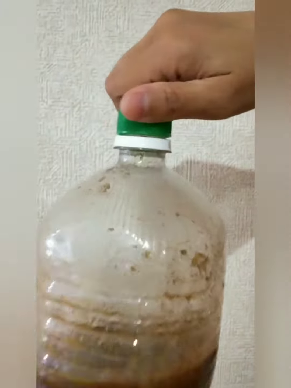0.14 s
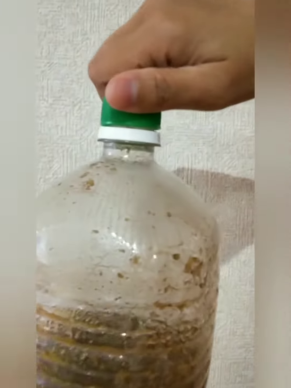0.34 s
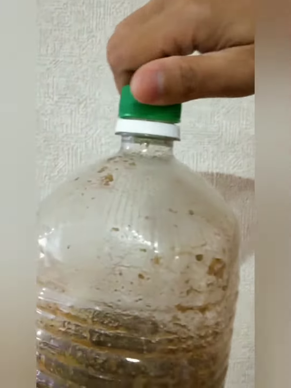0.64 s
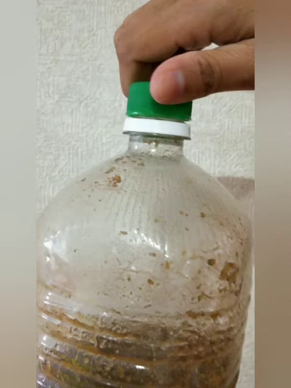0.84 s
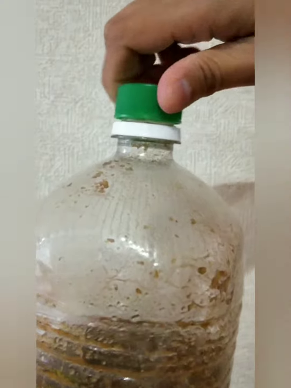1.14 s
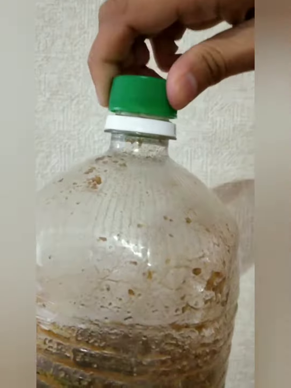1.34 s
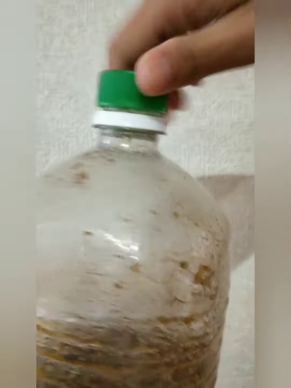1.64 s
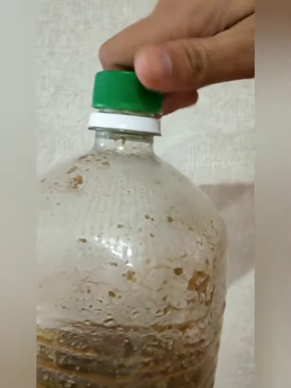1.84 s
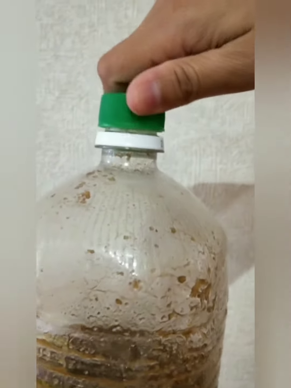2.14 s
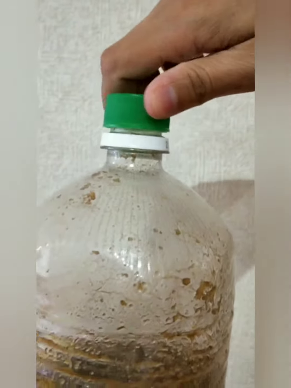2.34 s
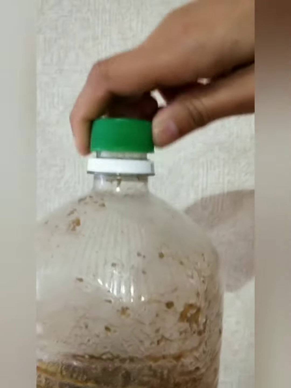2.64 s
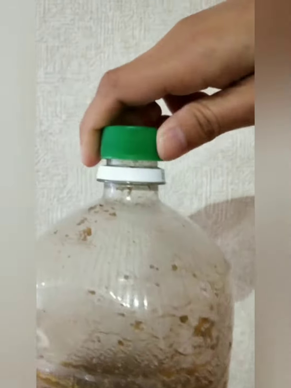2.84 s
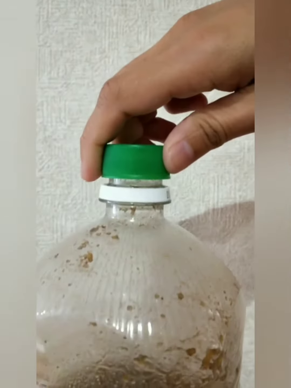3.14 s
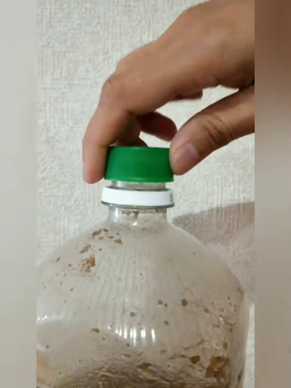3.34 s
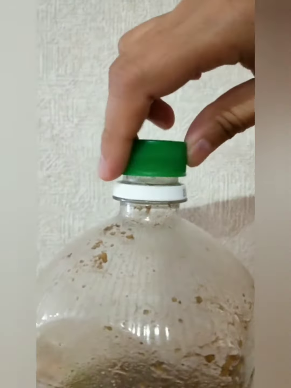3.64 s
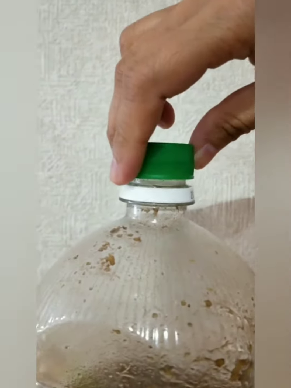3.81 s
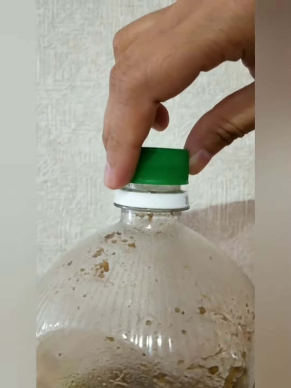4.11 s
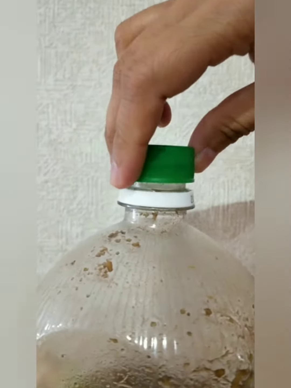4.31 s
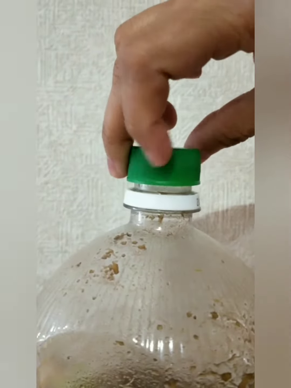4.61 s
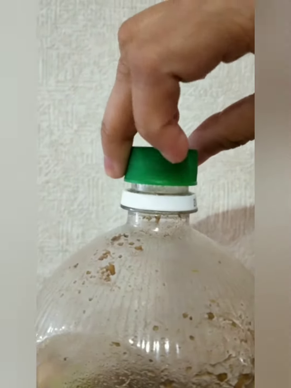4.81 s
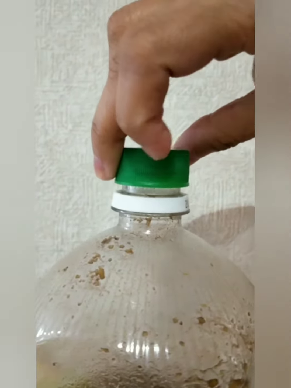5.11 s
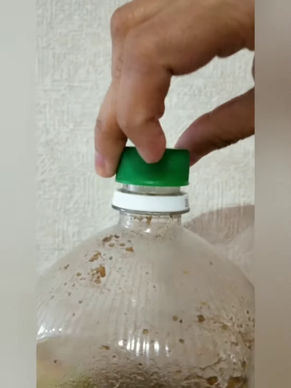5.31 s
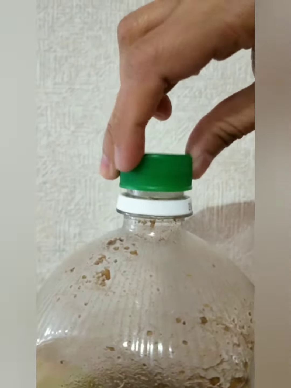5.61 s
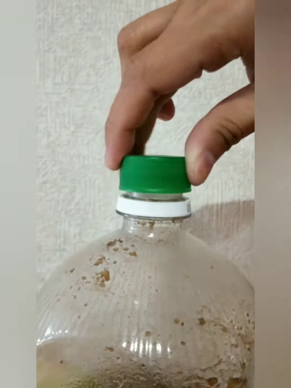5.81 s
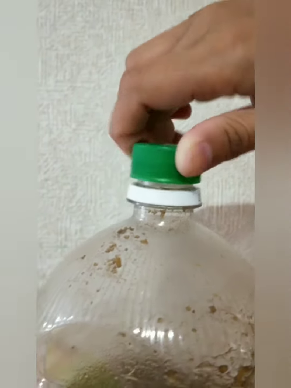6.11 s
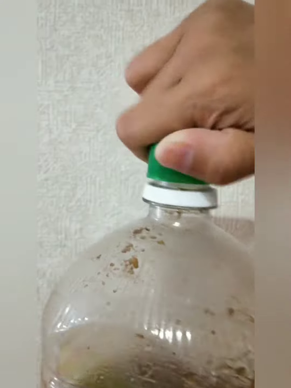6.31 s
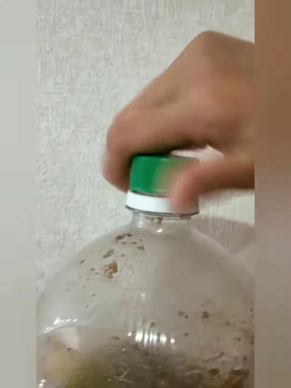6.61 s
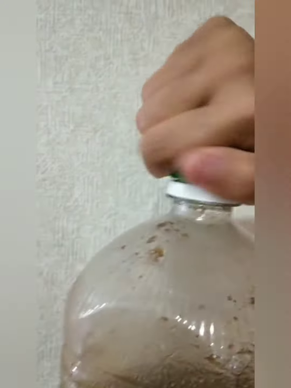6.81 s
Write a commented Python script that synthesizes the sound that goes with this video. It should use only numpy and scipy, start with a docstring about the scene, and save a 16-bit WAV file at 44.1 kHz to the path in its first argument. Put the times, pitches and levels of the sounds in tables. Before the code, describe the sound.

A phone microphone close to a large plastic bottle picks up low room rumble and tiny handling clicks. The cap loosens and pressurised gas rushes out in a strong sibilant hiss, leaning to the right. Over it, irregular loud cracks of buckling plastic ring briefly, nearer the left. The hiss sags and closes off, leaving near silence, faint creaks, and finally scratchy rubbing and light knocks.

```python
"""Over a low room hum, fingers slip, rub and knock on the cap of a large plastic bottle of fermenting drink.
The cap is eased close to a phone in a small room: gas hisses out as turbulent noise in two coloured bands.
As the pressure falls, the swollen wall snaps back panel by panel, each push ringing the wall's modes.
Creaks, rubs and knocks before and after are contacts that shake the same modes far more gently."""
import sys
import numpy as np
from scipy import signal
from scipy.fft import rfft, irfft, next_fast_len
from scipy.io import wavfile
from scipy.ndimage import uniform_filter1d, map_coordinates

SR = 44100
rng = np.random.default_rng(int(sys.argv[2]) if len(sys.argv) > 2 else 0)


def wrap_up_sound(samples):
    """Save the sound to the file named by the first command line argument, as 16-bit audio."""
    columns = np.atleast_2d(samples).T
    # keep every value between -1 and 1, then stretch to whole-number steps
    tamed = np.clip(columns, -1, 1)
    steps = np.round(tamed * 32767).astype(np.int16)
    wavfile.write(sys.argv[1], SR, steps)


N = 306495

# Spectrum of dry friction, for creaks and rubs: frequency_hz, relative density_db (per Hz)
SCRATCH_SPECTRUM = [(2200, -24), (3200, -9), (4200, -18.5), (5500, 0), (6500, 1.5), (7300, -15),
                    (9000, -32.5), (16000, -36)]


def gas(puff_rise_s=0.051, puff_fall_s=.1, puff_jet_db=-5):
    """Turbulent jet noise: the level follows the flow, and the finest hiss, on the right, fades fastest."""
    # Broad hiss of the jet under the cap: frequency_hz, relative density_db (per Hz)
    jet_spectrum = [(50, -17), (130, -12.5), (450, -19), (900, -20.5), (1600, -12), (2800, -10),
                    (3700, -24), (4400, -16), (5200, -7), (6300, 2.5), (7200, -10.5), (8700, -11.5),
                    (16000, -26.5)]
    # Finest hiss: frequency_hz, relative density_db (per Hz)
    spray_spectrum = [(3000, -38), (7000, -12.5), (8800, -18), (10000, -16.5), (12500, -14), (13700, -10.5),
                      (15000, -2), (16000, -13.5)]
    # Small leaks as the cap shifts: start_s, length_s, level_db
    puff_table = [(1.503, 0.022, -90), (6.597, 0.042, -86), (6.665, 0.017, -79.5), (6.742, 0.018, -76.5)]
    # The seal opens, the pressure holds and then sags, and the seal closes again
    open_s, open_for_s, open_rise_s, close_fall_s = 2.5903, .7, 0.069, 0.49
    hold_s, sag_s, sag_db = 0.18, 0.41, 9.5
    jet_db, spray_db = -39, -33  # at full flow, before flutter and room
    spray_growth = 1.55  # dB of fine spray per dB of flow

    spent = np.clip((np.arange(N) / SR - open_s - hold_s) / sag_s, 0, 1)
    pressure_db = -sag_db * np.sin(np.pi / 2 * spent) ** 2
    flow_db = stroke_db(open_s, open_for_s, open_rise_s, close_fall_s) + pressure_db
    puffs = sum(amp(db + stroke_db(s, length_s, puff_rise_s, puff_fall_s)) for s, length_s, db in puff_table)
    flutter = amp(0.087 * wobble(45) + 0.92 * wobble(250))

    jet_level = amp(jet_db + flow_db) + amp(puff_jet_db) * puffs
    jet = jet_level * noise(shape(jet_spectrum), alike=.6) * pan(-.5)
    spray_level = amp(spray_db + spray_growth * flow_db) + puffs
    spray = spray_level * noise(shape(spray_spectrum), alike=.6) * pan(-8.5)
    return in_room(flutter * (jet + spray), wet_db=-8.5)


def snaps(crisp_hz=2690):
    """Snap-through buckling, panel by panel: a sharper flip ticks more, thuds less and lies further left."""
    # Panel flips: start_s, relative level_db, sharpness_hz, panel_pitch_hz, relative ring_db
    flips = [(3.1376, -20, 2860, 1137, 1.5), (3.2340, -16.5, 1491, 795, 4.5), (3.3713, -23, 1876, 1520, 3),
             (3.4017, -22.5, 2460, 2110, 3), (3.4690, -30.5, 3546, 1520, -1), (3.5447, -23.5, 1670, 557, 6),
             (3.6779, -50, 1450, 1000, -5)]
    out = np.zeros((2, N))
    for s, db, sharp_hz, panel_hz, ring_db in flips:
        octaves = np.log2(sharp_hz / crisp_hz)  # sharpness against a typical crisp snap
        tick_db = 0.91 + 31 * octaves
        thud_db = -14.5 - 17.5 * octaves
        side_db = 5.8 + 3 * octaves
        add(out, s, snap(db, sharp_hz, panel_hz, ring_db, tick_db, thud_db, side_db))
    return out


def snap(db, sharp_hz, panel_hz, ring_db, tick_db, thud_db, side_db, panel_q=13, tick_hz=5850, tick_width=1250,
         landing_s=0.0063, landing_hz=850, bounce_db=-5, bounce_t60=0.064, bass_ratio=11):
    """Impulse response of a flip: a sharp push rings panel and wall, the crease ticks, a duller push lands."""
    t = np.arange(SR * 2 // 3) / SR
    push = np.zeros((2, len(t)))
    push[:, 0] = 1
    # The push bounces about the bottle and off the near wall, dying within tens of milliseconds
    bounce_fade = amp(-60 * t / bounce_t60) * (1 - np.exp(-t / .0012))
    bounces = noise(np.ones_like, alike=0.6, size=len(t)) * bounce_fade
    bounces *= amp(bounce_db) / np.linalg.norm(bounces[0])

    def shell(f):
        """Transfer function from the push to the sound of wall, crack, landing and tick."""
        delay = np.exp(-2j * np.pi * f * landing_s)
        landing = amp(thud_db) * softened(f, landing_hz) * delay
        # The moving panel shoves the air directly, beside the modes
        crack = amp(-3) * resonance(f, 1600, 4300) * resonance(f, 1607, 5600)
        tick_band = resonance(f, tick_hz, tick_width) * resonance(f, 5500, 6900)
        tick = amp(tick_db - 8.5) * tick_band * softened(f, 7000) ** 3
        # A quicker flip is a smaller panel, which moves less bass
        thin = (1j * f / (1j * f + sharp_hz / bass_ratio)) ** 2
        return softened(f, sharp_hz) * thin * (wall(f) + crack) + landing * wall(f) + tick

    def panel_mode(f):
        """The flipping panel's own resonance under the same push."""
        return softened(f, sharp_hz) * resonance(f, panel_hz, panel_hz / panel_q)

    panel = amp(ring_db - 0.5) * filtered(push, panel_mode)
    struck = filtered(push + bounces, shell) + panel
    return in_room(amp(db + 33.5) * struck, wet_db=-12.5) * pan(side_db)


def wall(f, vary_db=3.5, detune=0.014):
    """Modal superposition: the bottle wall's modes, excited a little differently by each contact."""
    # Modes of the bottle wall: mode_hz, width_hz, level_db (before random variation)
    modes = [(162, 69, -12.5), (315, 43, -7.5), (410, 43, -10.5), (573.4, 120, -3.5), (682.4, 40, -5),
             (792.6, 70, -3.5), (938, 34, -7.5), (1109.5, 100, -0.5), (1320, 110, -5.5), (1455, 160, 2.5),
             (1619, 110, -11.5), (1979, 57, 3.5), (2580, 430, -12.5), (3230, 380, -4), (3400, 150, -7)]
    chance = rng.standard_normal((len(modes), 2))
    total = 0
    for k, ((hz, width, db), (louder, sharper)) in enumerate(zip(modes, chance)):
        mode = resonance(f, hz * (1 + detune * sharper), width)
        total = total + (-1) ** k * amp(db + vary_db * louder) * mode  # neighbours in opposite phase
    return total


def knocks(ring_db=7.5, thud_db=-6, side_db=5):
    """Impact excitation: a light knock on the cap rings the same wall as a snap, far more gently."""
    # Knocks of fingers and thread: start_s, relative level_db, sharpness_hz, pitch_hz, relative tick_db
    taps = [(0.703, -57, 780, 386, -28), (1.499, -63, 604, 282, -31.5), (4.807, -57, 1390, 1410, -3.5),
            (4.8412, -58, 1405, 1530, -9.5), (6.412, -59, 1530, 806, -5.5), (6.858, -50, 2230, 886, -12),
            (6.8859, -49, 2160, 1030, -10), (6.932, -45, 1580, 1086, 5)]
    out = np.zeros((2, N))
    for s, db, sharp_hz, hz, tick_db in taps:
        knock = snap(db, sharp_hz, hz, ring_db, tick_db, thud_db, side_db, tick_hz=6200, tick_width=390)
        add(out, s, knock)
    return out


def rubs(rub_q=1.68, rise_s=0.13, fall_s=0.1, squeak_db=-3):
    """Sliding friction: uneven little catches shake the wall, squeak faintly and scratch."""
    # Rubs of fingers and thread: start_s, length_s, relative level_db, pitch_hz, scratch_db (over the wall)
    strokes = [(1.11, 0.081, -88, 1366, -18), (1.443, .05, -88.5, 1290, -7), (1.74, 0.063, -80.5, 920, -19),
               (3.769, 0.21, -86.5, 750, -14), (4.53, 0.26, -77, 700, -28.5), (6.279, .04, -84, 1100, -8.5),
               (6.499, .18, -72.5, 885, -2.5), (6.749, 0.017, -71, 894, 4), (6.839, .11, -69, 1090, -1.5)]
    out = np.zeros((2, N))
    for s, length_s, db, hz, scratch_db in strokes:
        start = round((s - .2) * SR)  # early enough for the rise
        level = amp(db + stroke_db(s, length_s, rise_s, fall_s)[start:start + SR])
        size = len(level)
        body = noise(lambda f: wall(f) * resonance(f, hz, hz / rub_q) ** 2, alike=0.57, size=size)
        body = (body + amp(squeak_db) * squeak(hz, size=size)) * pan(6.3)
        scratch = noise(shape(SCRATCH_SPECTRUM), alike=0.11, size=size)
        add(out, start / SR, level * (body + amp(scratch_db) * scratch))
    catches = unit(amp(4.0 * wobble(60) + 1.7 * wobble(300)))
    return in_room(catches * out, wet_db=-8)


def creaks(slip_hz=330, slip_db=3, width_ratio=1.2, squeak_db=4):
    """Stick-slip friction: a brief run of uneven slips shakes the wall, squeaks at one pitch and scratches."""
    # Creaks of cap and wall: middle_s, relative level_db, half_length_s, pitch_hz, scratch_db (over the wall)
    slips = [(0.559, -79, 0.0058, 1303, -24), (.961, -81.5, 0.0085, 1280, -26),
             (1.142, -80.5, 0.013, 2520, 2), (1.508, -61, .009, 1310, -10), (1.517, -62, .009, 433, -13),
             (2.973, -40, .005, 1430, -24.5), (3.09, -42.5, 0.0038, 2090, -23),
             (4.532, -79.5, 0.0023, 757, -11), (4.563, -74.5, .005, 723, -18),
             (4.708, -70.5, 0.0028, 708, -28), (5.324, -85, .006, 2570, -0.5),
             (5.688, -71, 0.0046, 1155, -20.5), (5.802, -57.5, 0.0047, 896, -24),
             (5.805, -69, 0.006, 1988, -21)]
    out, t = np.zeros((2, N)), np.arange(SR // 2) / SR
    middle, size = t[-1] / 2, len(t)
    for s, db, half_s, hz, scratch_db in slips:
        body = noise(lambda f: wall(f) * resonance(f, hz, hz * width_ratio), alike=.8, size=size)
        scratch = noise(shape(SCRATCH_SPECTRUM), alike=0.18, size=size)
        swell = amp(db) * np.exp(-((t - middle) / half_s) ** 2 / 2)
        creak = body + amp(squeak_db) * squeak(hz, size=size) + amp(scratch_db) * scratch
        add(out, s - middle, swell * creak)
    unevenness = unit(amp(slip_db * wobble(slip_hz)))
    return in_room(out * unevenness * pan(2.1), wet_db=-8.0)


def squeak(hz, size=N, q=14):
    """Stick-slip near one rough pitch, as noise through a narrow and a broad resonance."""
    return noise(lambda f: resonance(f, hz, hz / q) * resonance(f, hz, hz / 3), alike=0.33, size=size)


def ambience():
    """Steady background: uneven low rumble of the building, wavering mains hum and faint microphone hiss."""
    # Rumble of the building: frequency_hz, relative density_db (per Hz)
    rumble_spectrum = [(30, -30), (42, -12.5), (60, -10.5), (75, -9.5), (100, 0), (125, -9.5), (155, -5.5),
                       (200, -10.5), (310, -16.5), (400, -30), (640, -37), (1300, -45.5), (4000, -57.5),
                       (16000, -60.5)]
    # Mains hum: frequency_hz, peak_db (about which it wavers)
    hum_tones = [(51.5, -74), (101, -71)]
    t = np.arange(N) / SR
    hum = 0
    for hz, db in hum_tones:
        phase = 2 * np.pi * hz * t + 0.62 * wobble(1)
        hum = hum + amp(db + wobble(27)) * np.sin(phase)
    rumble = patchy(noise(shape(rumble_spectrum), alike=.92), depth_db=3.5, size=2048)
    hiss = noise(np.ones_like, alike=0)
    return hum + amp(-69.0) * rumble + amp(-102) * hiss


def in_room(x, wet_db, build_s=0.0064):
    """Reverberation: x plus a diffuse tail that builds up quickly and decays at its own rate in each band."""
    # Decay of the room: frequency_hz, t60_s
    decay_times = [(150, .5), (500, 0.5), (1500, 0.3), (6000, 0.26), (15000, 0.29)]
    hz, t, z = signal.stft(rng.standard_normal((2, SR * 3 // 4)), SR, nperseg=256)
    fade = amp(-60 * t / along(decay_times, hz)[:, None]) * (1 - np.exp(-t / build_s))
    tail = signal.istft(z * fade, SR, nperseg=256)[1]
    tail = tail / np.linalg.norm(tail[0])
    return x + amp(wet_db) * signal.fftconvolve(x, tail, axes=1)[:, :x.shape[1]]


def left_late(x, lag_s):
    """Interaural-style delay: x reaches the left microphone lag_s after the right."""
    return filtered(x, lambda f: np.exp(np.array([[-1j], [1j]]) * np.pi * f * lag_s))


def pan(db):
    """Level-difference stereo: left and right gains, positive db to the left."""
    return amp(np.array([[db], [-db]]) / 2)


def resonance(f, hz, width):
    """Damped oscillator: one causal resonance with peak gain 1."""
    return 1j * f * width / (hz * hz - f * f + 1j * f * width)


def softened(f, hz):
    """Finite contact time: a push of limited sharpness rolls off steeply and causally above hz."""
    return signal.freqs(*signal.butter(4, 1, analog=True), f / hz)[1]


def noise(response, alike, size=N):
    """Filtered noise in stereo, rms 1; alike is the correlation of the two sides."""
    a, b = rng.standard_normal((2, size))
    turn = np.arccos(np.clip(alike, -1, 1)) / 2
    sides = np.cos(turn) * a + np.sin(turn) * np.array([b, -b])
    return unit(filtered(sides, response))


def patchy(x, depth_db, size):
    """Random spectral modulation: the colour of x shifts from moment to moment; size is the frame in samples."""
    z = signal.stft(x, nperseg=size)[2]
    patches = uniform_filter1d(rng.standard_normal(z.shape[1:]), size=5, axis=0)
    patches = uniform_filter1d(patches, size=7, axis=1)
    return unit(signal.istft(z * amp(depth_db * unit(patches)), nperseg=size)[1][:, :N])


def stroke_db(s, length_s, rise_s, fall_s):
    """Exponential envelope in dB: attack, hold from s, release; rise and fall are times for 60 dB."""
    t = np.arange(N) / SR - s
    return -60 * (np.maximum(-t, 0) / rise_s + np.maximum(t - length_s, 0) / fall_s)


def wobble(rate):
    """Slow random modulation: random knots, rate of them a second, joined by straight lines."""
    knots = rng.standard_normal(int(N * rate / SR) + 4)
    return map_coordinates(knots, [np.arange(N) * rate / SR], order=1)


def filtered(x, response):
    """Linear filtering: the spectrum of x times a complex response of frequency."""
    n = x.shape[-1]
    m = next_fast_len(n + SR // 10)
    return irfft(rfft(x, m) * response(np.fft.rfftfreq(m, 1 / SR)), m)[..., :n]


def shape(points):
    """Spectral envelope: the gain of a (Hz, dB) spectrum."""
    return lambda f: amp(along(points, f))


def along(points, hz):
    """Interpolation of (Hz, value) points on a logarithmic frequency axis."""
    f, v = np.transpose(points)
    return np.interp(np.log(hz + 1), np.log(f + 1), v)


def amp(db):
    """Decibel law: level to amplitude gain."""
    return 10 ** (np.asarray(db) / 20)


def unit(x):
    """Power normalisation: x scaled to rms 1."""
    return x / np.sqrt(np.mean(x ** 2) + 1e-20)


def add(track, s, sound):
    """Superposition: mix a sound into the track from time s."""
    part = track[:, max(round(s * SR), 0):][:, :sound.shape[1]]
    part += sound[:, :part.shape[1]]


def scene():
    """Superposition: cap and wall sounds arrive with different delays between the sides, over the hum."""
    # The cap is nearer the right microphone, the snapping wall nearer the left
    cap_lag_s, wall_lead_s = .00019, .00008
    cap = gas() + knocks() + creaks() + rubs()
    return left_late(cap, cap_lag_s) + left_late(snaps(), -wall_lead_s) + ambience()


def record(dry, top_hz=15750):
    """Band limiting: the phone's response falls away steeply above top_hz."""
    return filtered(dry, lambda hz: amp(-np.clip((hz - top_hz) / 60, 0, 12) ** 2))


dry = scene()
out = record(dry)
wrap_up_sound(out)
```